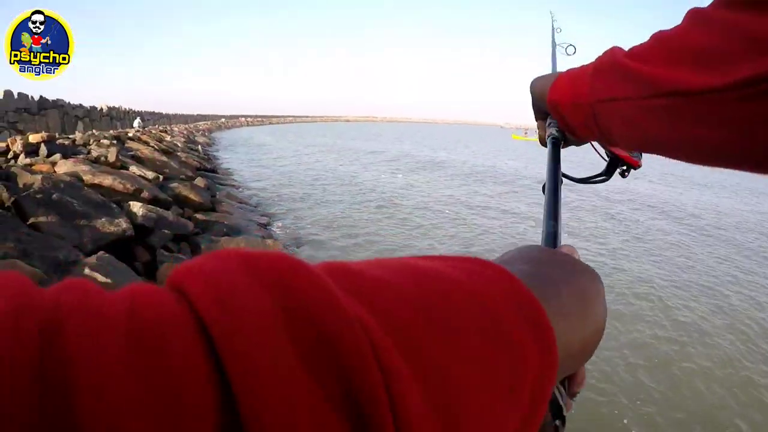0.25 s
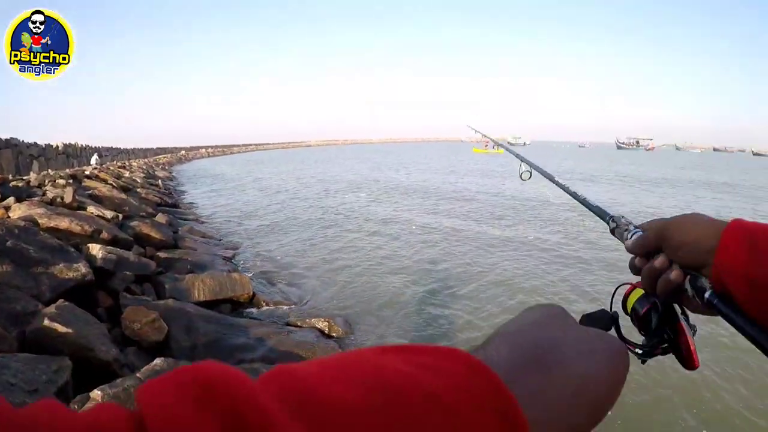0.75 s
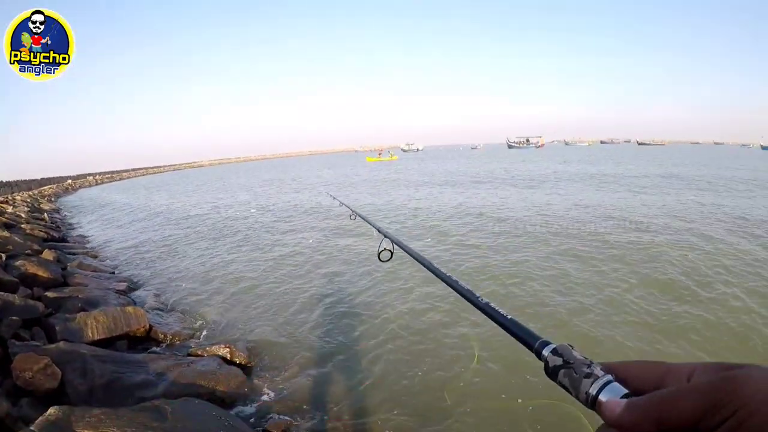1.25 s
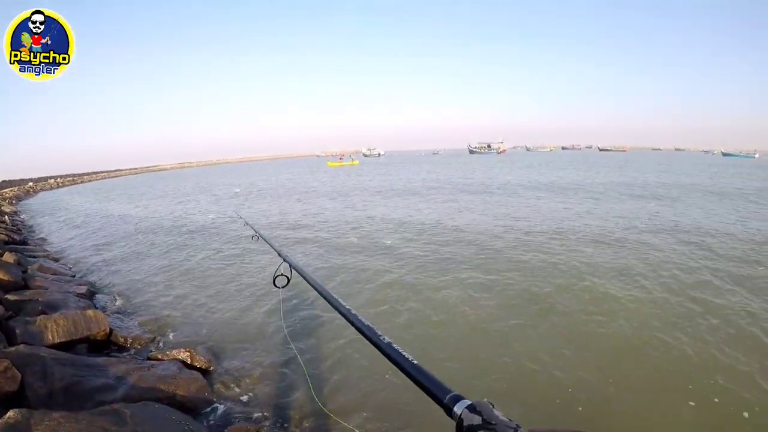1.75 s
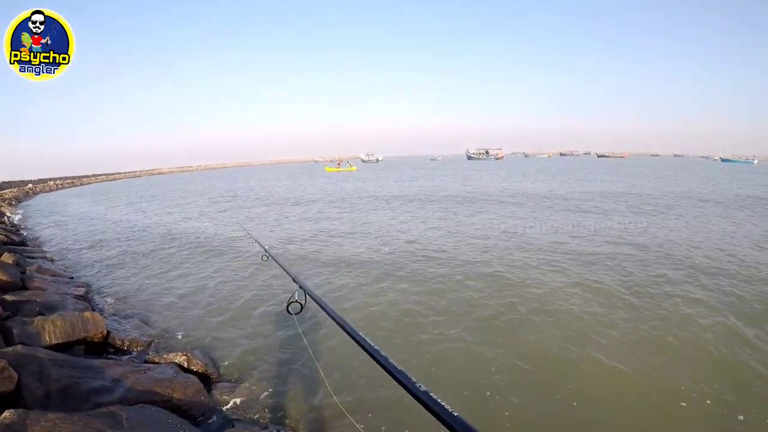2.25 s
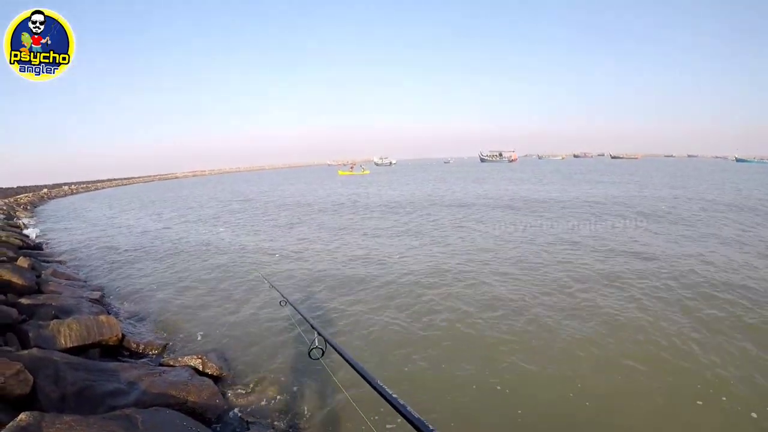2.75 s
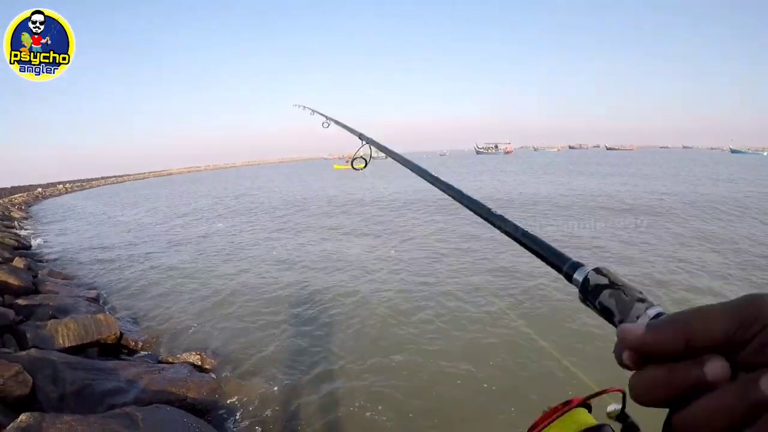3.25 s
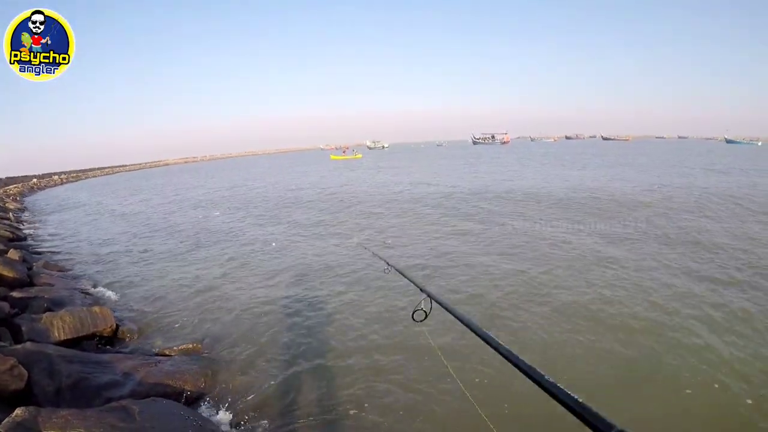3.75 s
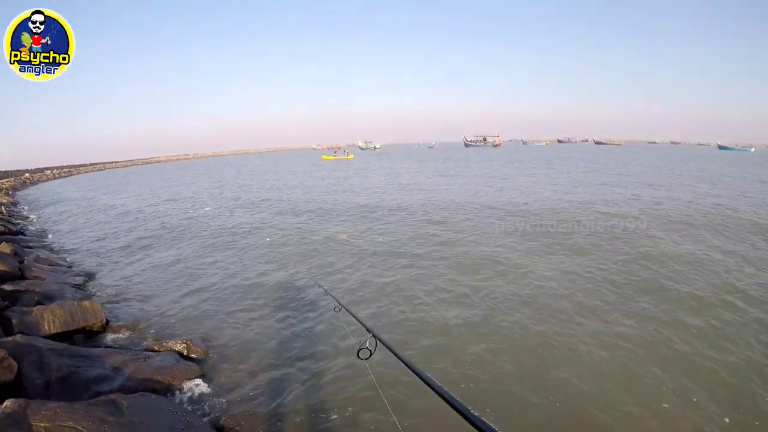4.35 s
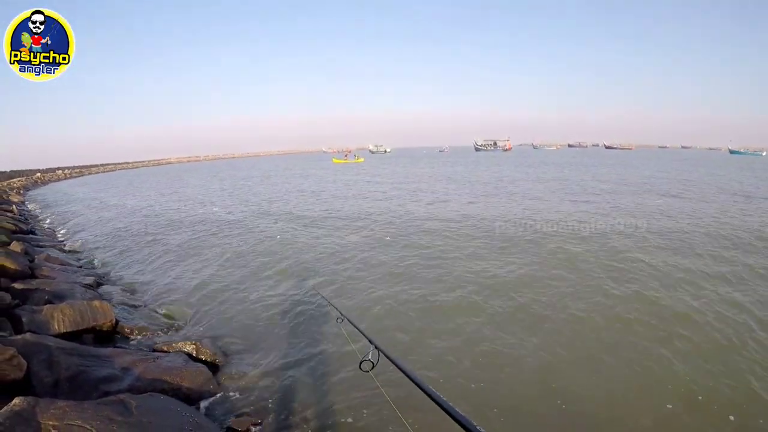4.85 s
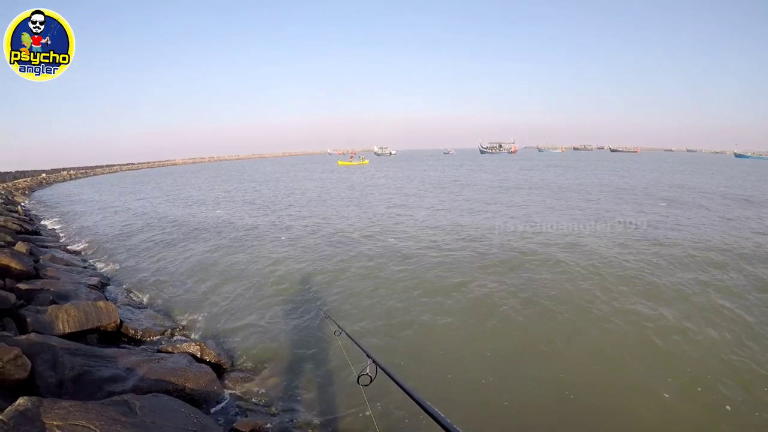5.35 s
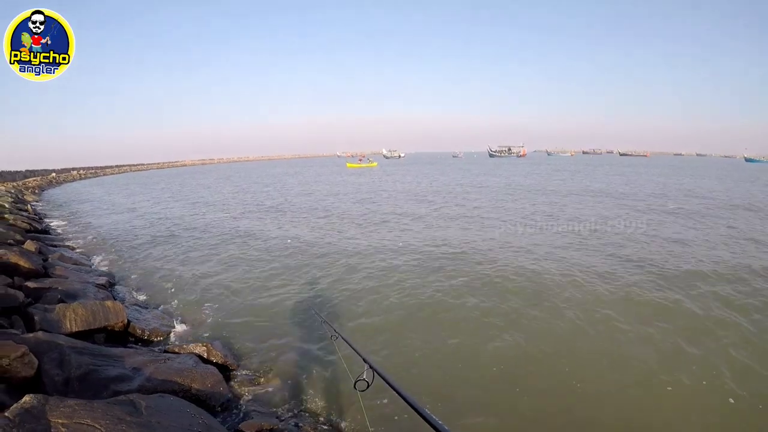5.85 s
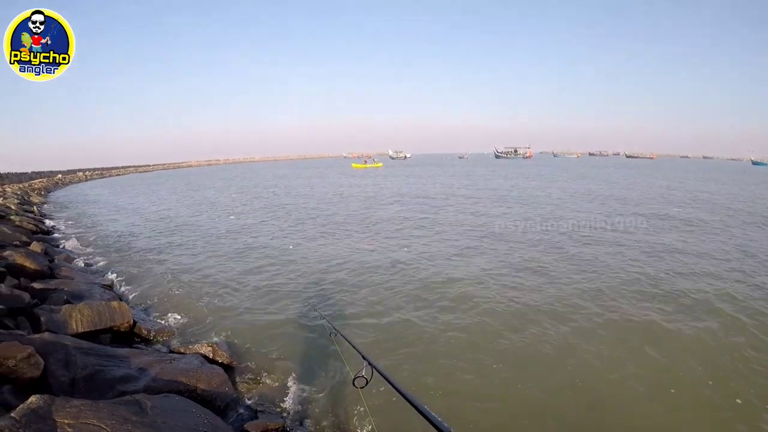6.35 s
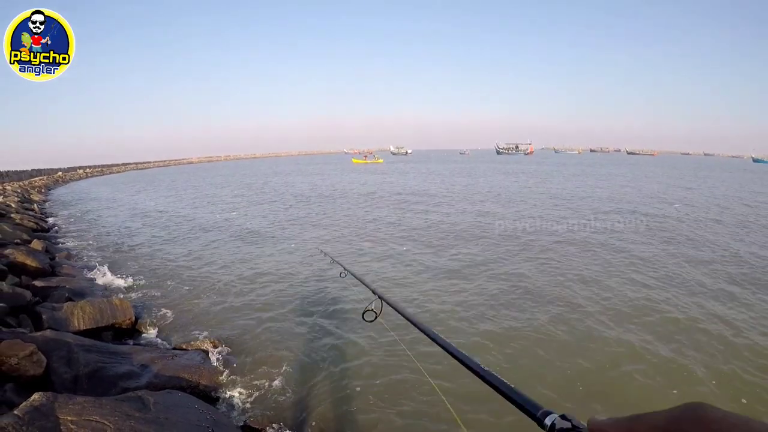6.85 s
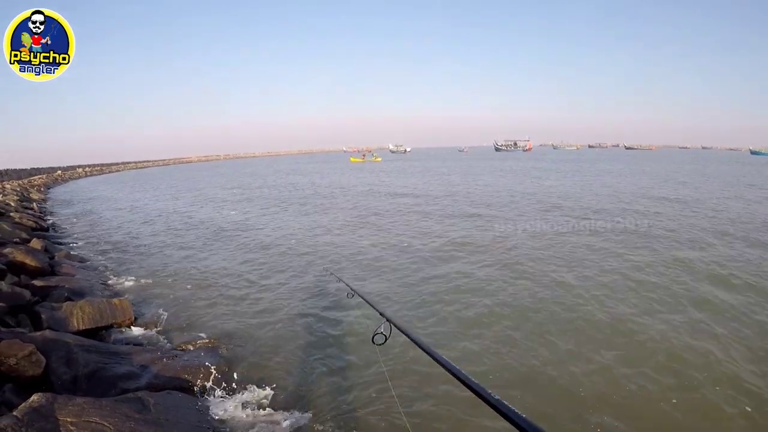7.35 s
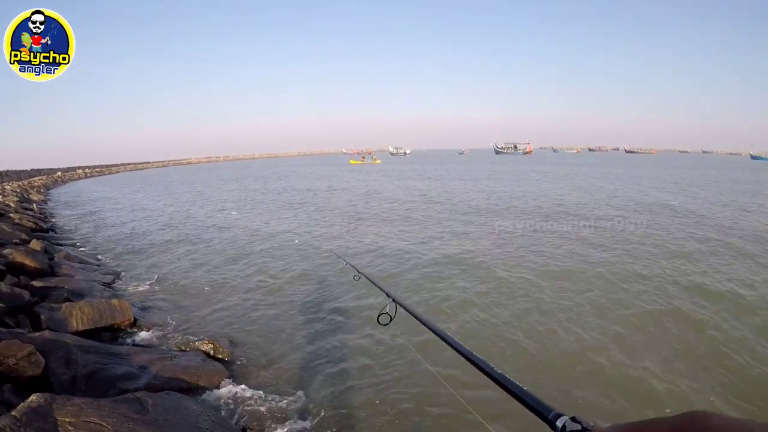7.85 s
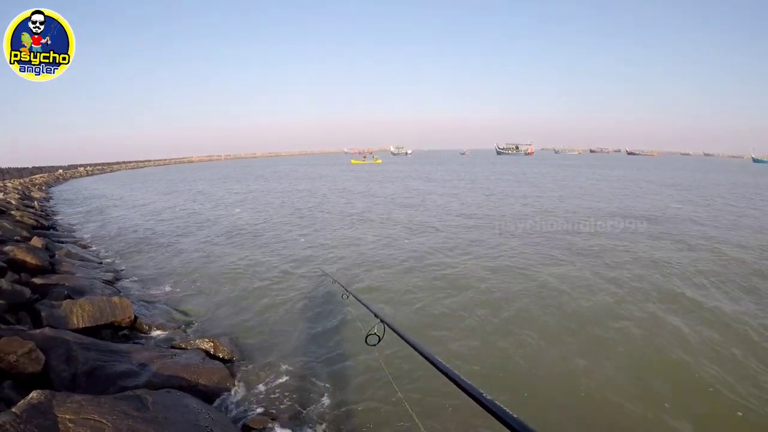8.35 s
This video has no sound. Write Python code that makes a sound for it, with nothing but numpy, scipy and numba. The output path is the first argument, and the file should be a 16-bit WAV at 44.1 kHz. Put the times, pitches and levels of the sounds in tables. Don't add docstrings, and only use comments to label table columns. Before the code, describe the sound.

Small waves gulp and slap against harbour boulders, with foam fizz, wind buffeting, a faint ship drone and one sharp reel click near two seconds.

```python
import sys
import numpy as np
from scipy import signal
from scipy.fft import rfft, irfft
from scipy.io import wavfile
from scipy.ndimage import uniform_filter1d
from numba import njit

SR = 44100
rng = np.random.default_rng(int(sys.argv[2]) if len(sys.argv) > 2 else 0)


def gain_from_db(level_db):
    decades = np.asarray(level_db, float) / 20
    return 10 ** decades


def store_wav(level_fs):
    pcm = np.round(np.clip(np.atleast_2d(level_fs), -1, 1) * 32767)
    wavfile.write(sys.argv[1], SR, pcm.T.astype(np.int16))


N = 379260
TIME = np.arange(N) / SR
FREQ = np.maximum(np.fft.rfftfreq(N, 1 / SR), 1)

# time in seconds, surge in dB, foam left fizzing in dB re surge.
SWELL = [(.36, -35, 1), (.55, -40.5, -3.5), (.78, -40.5, -5.5), (1.45, -53, 4), (2.6, -39.5, -7),
         (3.05, -41.5, -4.5), (3.7, -33.5, 0), (3.95, -29, -9), (4.3, -32, -7.5), (4.85, -39, -6.5),
         (5.1, -40.5, 2.5), (5.85, -38.5, 1), (6.3, -34.5, -2), (6.85, -33, -2), (7.15, -29, -2),
         (7.95, -29, -8), (8.25, -34, -10.5), (8.6, -37, -10.5)]
PART_HZ = [350, 1100, 4200, 8600]
# frequency in Hz, density in dB per Hz.
WASH_SPECTRUM = [(59, -74), (100, -85), (132, -0.5), (162, -3.5), (293, -2), (725, -9), (933, -12),
                 (1580, -16), (2260, -20), (3910, -23.5), (6620, -24), (9680, -31.5), (11500, -24),
                 (13900, -47.5), (15400, -63)]
# time in seconds, level change
# in dB, length in ms.
LULLS = [(0.92, -7, 38), (1.2, -3.5, 90), (2.65, -2, 75), (5.35, 0, 130), (6.83, 2, 29), (7.8, 0, 68),
         (1.779, -4, 6), (3.05, -6, 6), (4.278, -6, 6), (4.389, -3, 6), (3.722, 0, 14), (3.775, -2, 22),
         (3.86, -7, 25), (4.42, 0, 20), (5.66, -2.5, 22), (6.48, -3, 30), (7.075, -13, 21), (7.23, -5, 18),
         (7.41, 3, 17), (7.5, 0.5, 17), (7.64, -2.5, 28)]
LULL_SHARE = [0.45, 0.29, 0.28, 0.29]
# time in seconds, level change in dB, length in ms.
FIZZ = [
    (.5, 1, 54),
    (1.58, 7, 66),
    (3.2, 0, 100),
    (4.15, 1.5, 90),
    (4.5, -1, 48),
    (5.45, -4.5, 380),
    (7.55, -1.5, 32),
    (7.66, -1, 34),
]
FIZZ_SHARE = [0, .2, .7, 1]
# time in seconds, peak in
# dB, pitch in Hz, ring in cycles.
GULPS = [(0.059, -21, 354, 9.1), (0.175, -18, 423, 4.6), (0.271, -15, 374, 7.7), (0.37, -20.5, 263, 6.4),
         (0.607, -23, 1160, 10), (0.822, -25, 670, 12), (3.648, -11.5, 378, 11.3), (3.67, -19.5, 202, 6),
         (3.689, -10.5, 361, 6.6), (3.804, -10, 275, 2), (3.907, -12, 183, 5.2), (4.016, -14, 397, 7.2),
         (4.046, -14, 183, 7.2), (4.329, -24, 300, 4.1), (4.398, -6, 540, 4.9), (5.088, -20.5, 693, 12),
         (5.16, -22, 282, 4.3), (5.59, -23.5, 475, 14), (6.059, -16.5, 284, 7.9), (6.97, -12, 284, 10.3),
         (7.002, -7, 385, 7), (7.039, -10.5, 352, 4.7), (6.955, -14, 205, 7), (7.199, -7, 446, 2.2),
         (7.278, -14.5, 875, 9.2), (7.31, -15, 256, 3.5), (7.445, -9.5, 181, 6), (7.605, -14, 510, 11),
         (7.684, -7.5, 286, 4.4), (7.868, -10.5, 307, 2.5), (8.184, -21, 183, 4.2),
         (0.474, -19.5, 397, 4.6), (0.58, -34, 483, 5), (0.715, -26, 860, 6), (3.839, -21, 600, 5),
         (4.453, -20, 330, 3.6), (4.515, -22, 367, 10), (5.49, -28, 915, 7), (6.241, -27, 638, 5),
         (6.592, -16, 470, 5), (6.627, -13.5, 460, 4.7), (6.793, -18, 455, 5.8), (6.899, -32, 600, 5),
         (7.125, -17, 490, 5), (7.169, -11, 700, 5.5), (7.25, -18, 657, 5), (7.716, -27, 589, 4.5),
         (7.96, -20, 956, 6), (8.198, -19, 630, 6.3),
         (3.698, -17, 800, 7), (3.811, -10.5, 513, 5), (3.821, -13, 208, 3.6), (4.32, -11.5, 280, 2),
               (4.332, -15, 700, 4), (4.63, -19.5, 150, 6), (7.146, -12, 302, 2.1), (7.221, -13, 350, 3.3),
               (7.318, -14.5, 290, 6.5), (7.397, -9, 260, 2.4), (7.455, -11, 330, 3.7),
               (0.24, -13, 330, 6.6), (0.3, -21, 400, 4.5), (5.57, -25, 510, 8)]
# time in seconds, peak in dB, pitch in Hz.
DROPS = [(0.0822, -18, 1830), (0.1431, -21, 3580), (0.1431, -19, 1250), (0.2024, -14, 1260),
         (0.3915, -25, 985), (0.5701, -22, 1620), (0.6529, -22, 1290), (1.7858, -25, 1800),
         (3.0579, -22, 4370), (3.5745, -19, 2240), (3.9402, -16, 1000), (4.076, -23, 1050),
         (4.285, -16, 1080), (5.3632, -25, 918), (5.4964, -34, 1100), (5.5253, -23, 1300),
         (5.7254, -31, 1320), (5.9908, -20, 1730), (7.1237, -15, 931), (7.219, -22, 993),
         (7.8486, -21, 1070), (7.871, -16, 956)]
# time in seconds, peak in dB, centre in Hz, length in ms.
SLAPS = [(3.0, -45, 2870, 2), (3.039, -34, 6600, 3.5), (3.06, -33, 4800, 1.8), (3.25, -25, 1430, 2),
         (3.269, -25.5, 844, 9.2), (3.44, -12.5, 850, 3), (3.46, -28.5, 7600, 5), (3.577, -20, 4470, 4.6),
         (3.694, -21, 780, 32), (3.66, -30, 3520, 47), (3.806, -27.5, 6790, 5.6), (3.941, -30, 1160, 1.8),
         (3.952, -32, 9200, 3), (4.287, -23, 1190, 5), (4.62, -33, 7840, 3.5), (4.741, -34, 6700, 3.9),
         (5.697, -28, 1560, 6.5), (5.7, -34, 4500, 5), (5.888, -37, 6750, 3.6), (6.006, -28, 3070, 3),
         (6.074, -24, 7750, 3.6), (6.297, -28, 4960, 7), (6.361, -27, 9100, 2.3), (6.457, -18, 1130, 4.4),
         (6.633, -25, 3000, 8.1), (6.632, -29.5, 7100, 7.1), (6.792, -27, 7040, 3),
         (7.004, -22.5, 4100, 6.8), (7.174, -18, 700, 16), (7.165, -25.5, 2760, 26),
         (7.45, -24.5, 1170, 110), (3.056, -30, 656, 5.4), (3.355, -28, 600, 6.6), (3.345, -34, 3800, 8),
         (3.469, -30.5, 4200, 12), (3.62, -25, 670, 5.4), (3.805, -19.5, 700, 12), (3.874, -28, 1830, 4),
         (4.074, -26, 800, 6.3), (4.496, -29, 2080, 3), (4.541, -30, 1850, 5.6), (5.182, -37, 1500, 4),
         (5.08, -33.5, 2700, 7.3), (5.799, -29, 915, 5), (6.05, -26, 900, 5.5), (6.576, -25, 2040, 5),
         (6.99, -22, 2230, 5), (7.053, -25, 4900, 6), (7.102, -22.5, 4200, 5), (7.849, -26, 4800, 4.2),
         (8.143, -26, 1750, 4.6)]
# time in seconds, peak in dB, centre in Hz, length in ms.
SPLASHES = [(3.577, -26, 2000, 4.4), (4.8, -39, 7800, 4), (4.6, -33, 4200, 5), (5.497, -33, 4000, 6),
            (5.182, -29, 4200, 4), (5.01, -38, 4700, 5), (3.68, -32, 5000, 40), (3.745, -30.5, 3400, 15),
            (3.95, -33.5, 6200, 60), (7.03, -19, 460, 39), (7.18, -19.5, 370, 39), (7.455, -20, 480, 26)]
# time in seconds, peak in dB, centre in Hz.
TICKS = [(0.497, -33, 1700), (0.576, -30, 1900), (0.772, -36, 1900), (0.806, -35, 1000), (0.802, -40, 6750),
         (0.932, -48, 9600), (0.953, -35, 3390), (1.099, -32, 3950), (1.575, -40, 7000), (1.575, -38, 1730),
         (1.593, -39.5, 6700), (1.592, -36.5, 1950), (1.778, -35.5, 3900), (1.788, -31, 1510),
         (1.886, -46, 4200), (1.99, -37, 1000), (2.068, -38, 2950), (2.212, -41, 8600),
         (2.237, -39.5, 8000), (1.328, -41, 2200), (1.328, -44, 4100), (1.407, -38, 4770),
         (1.46, -44, 3300), (1.532, -45, 7200), (1.655, -43, 5130), (1.747, -37.5, 1900),
         (1.916, -49, 4100), (1.962, -49, 3700), (1.15, -44, 3000), (0.953, -43, 1600), (1.1, -45, 2100)]
# time in seconds, level in dB.
LINE_LEVEL = [(0, -49.5), (.8, -52.5), (1.1, -51.5), (1.4, -51), (1.7, -62), (2.2, -79), (2.3, -101),
              (4.85, -79), (5.05, -51), (5.45, -51), (5.9, -59), (6.2, -80)]
# centre in Hz, width in Hz, level in dB.
LINE_PEAKS = [(4500, 930, -2), (5850, 1000, -2), (9100, 2200, -10), (9400, 300, -18), (12500, 2800, -15)]
# frequency in Hz, level in dB, T60 in seconds.
BAIL_MODES = [(800, -8.5, 0.011), (1600, -8.5, 0.018), (1790, 3.5, .005), (2200, -13, 0.0057),
              (2830, -23, 0.012), (4600, -21.5, 0.012), (7300, -18, .004)]
# time in seconds, rumble in dB, low-cut residue in dB re rumble.
WIND_LEVEL = [(0.0, -45, -34), (0.36, -41.5, 1), (1.58, -57, 13.5), (2.01, -31.5, -2.5), (2.4, -30.5, -5.5),
              (2.94, -29, -3.5), (3.02, -35.5, -10), (3.28, -32, -14), (3.62, -34, -6), (3.75, -41.5, -9),
              (4.79, -42.5, 3.5), (6.82, -68.5, -1), (7.5, -65, 12), (8.2, -70, 23), (8.6, -67, 27)]
# frequency in Hz, density in dB per Hz.
GUST_SPECTRUM = [(12, -33), (20, 0.5), (49, 1), (139, 6.5), (316, -18), (357, -20), (403, -25), (500, -23),
                 (650, -51), (1100, -120)]
# time in seconds, peak in dB, frequency in Hz, length in ms.
BUFFETS = [(1.695, -19.5, 193, 10), (1.952, -22, 202, 5.6), (1.97, -21.5, 208, 8), (2.012, -14, 168, 16),
           (2.073, -11.5, 265, 5.8), (2.102, -15.5, 162, 9.3), (2.165, -22, 243, 8.3),
           (2.185, -15, 211, 3.6), (2.32, -16, 180, 19), (2.425, -31, 143, 19), (2.553, -20.5, 182, 6.9),
           (2.596, -22.5, 151, 17), (2.932, -17.5, 151, 6.5), (3.584, -13.5, 167, 5),
           (3.634, -23, 168, 7.6), (4.185, -21, 179, 17), (4.361, -14.5, 205, 4.6),
           (4.384, -15.5, 173, 8.1), (4.423, -22, 169, 11), (4.641, -22, 174, 19), (4.754, -21, 176, 39),
           (4.82, -22, 179, 28), (4.994, -21, 168, 12), (5.81, -21.5, 198, 8.2), (6.15, -24, 180, 9),
           (8.332, -17.5, 220, 10), (8.354, -14, 180, 15), (8.384, -21.5, 183, 15), (8.421, -19, 194, 12)]
# time in seconds, peak in dB, frequency in Hz, length in ms.
LEE_BUFFETS = [
    (1.794, -19, 218, 7.8),
    (1.899, -21.5, 188, 7.6),
    (2.242, -23, 157, 4.9),
    (2.762, -18, 148, 9.1),
]
# time in seconds, peak in dB, frequency in Hz, length in ms.
THUMPS = [
    (2.089, -25, 108, 30),
    (2.285, -26, 83.4, 30),
    (2.493, -24, 91.5, 30),
    (2.719, -22, 51.1, 30),
    (2.892, -21, 51.1, 30),
    (3.127, -26, 70.0, 30),
]
# time in seconds, level in dB.
DRONE_LEVEL = [(0, -39), (.5, -40), (1.4, -39.5), (2, -38.5), (2.6, -43.5), (3.2, -42), (3.8, -56),
               (8.6, -51.5)]
# frequency in Hz, lead in radians.
LEFT_LEAD = [(0, 0), (430, -.3), (775, -1.3), (1120, -3.5), (1460, -3.8), (2150, -6.7), (2500, -8.9),
             (4220, -6.5), (4900, -8.2), (5900, -10.6), (7000, -9.9), (9000, -12.2), (15000, -15)]
# frequency in Hz, gain in dB.
LEFT_TILT = [(150, 1.5), (430, 0), (780, -4.5), (1150, -7.5), (1800, -5), (2900, 0), (4200, -1), (5100, 4),
             (6200, -1), (9400, 1)]
# frequency in Hz, coherence 0 to 1.
ALIKE = [(150, .99), (430, .93), (780, .65), (1300, .5), (2400, .25), (4100, .6), (6000, .4), (12000, .3)]
# centre in Hz, width in Hz, gain in dB.
GROUND_NOTCHES = [(1430, 95, -2.5), (2770, 290, -1)]
# time in seconds, side share 0 to 1.
WIDTH = [(0, 0.003), (1.0, 0.0017), (1.05, 0.15), (1.4, 0.52), (1.9, 0.86), (8.6, 1)]
# time in seconds, threshold in dB re local mean, top in Hz.
SPARSE = [(0, -10, 15200), (1.2, -10, 15300), (1.35, 3, 15150), (2.25, 4.5, 15050), (2.35, 6.5, 14000),
          (3.2, 6.5, 14200), (5.5, 7, 14400), (7.0, 7.5, 14200), (8.6, 7, 14200)]

BAIL_S, BAIL_DB = 2.2805, -2


def unit(x):
    return x / np.sqrt(np.mean(x ** 2))


def curves(table):
    s, *columns = np.transpose(table)
    return [np.interp(TIME, s, column) for column in columns]


def on_log(hz, table):
    f, value = np.transpose(table)
    return np.interp(np.log(hz), np.log(np.maximum(f, 1)), value)


def humps(table):
    return sum(db * np.exp(-((TIME - s) * 1000 / ms) ** 2) for s, db, ms in table)


def band(x, hz, width_hz):
    edges = np.clip([hz - width_hz / 2, hz + width_hz / 2], 5, SR / 2 - 1000)
    return signal.sosfilt(signal.butter(2, edges, "bandpass", fs=SR, output="sos"), x)


def walk(rate_hz):
    k = int(SR / rate_hz)
    held = np.repeat(rng.standard_normal(N // k + 1), k)
    return unit(uniform_filter1d(uniform_filter1d(held, k), k)[:N])


@njit
def bubbles(n, start, turn, cycles, size, glide):
    out = np.zeros(n)
    for k in range(len(start)):
        length = cycles[k] * 2 * np.pi / turn[k]
        phase = 0.
        for i in range(min(int(3 * length), n - start[k])):
            u = i / length
            phase += turn[k] * (1 + glide * u)
            out[start[k] + i] += size[k] * np.sin(phase) * 8 * u * np.exp(-3 * u)
    return out


def ports(direct, scattered):
    alike = np.clip(on_log(FREQ, ALIKE), 0, 1)
    gain = gain_from_db(on_log(FREQ, LEFT_TILT))
    lead = np.interp(FREQ, *np.transpose(LEFT_LEAD))
    ground = gain_from_db(sum(db * np.exp(-((FREQ - hz) / width) ** 2) for hz, width, db in GROUND_NOTCHES))
    right = rfft(direct)
    left = (alike * right + np.sqrt(1 - alike ** 2) * rfft(scattered)) * gain * np.exp(1j * lead)
    centre = np.sqrt(1 + gain ** 2 + 2 * alike * gain * np.cos(lead)) / 2
    return irfft(np.array([left, right]) / centre * ground, N)


def wash_parts():
    surge, foam = curves(SWELL)
    sleeve = 1 / (1 + (TIME / 0.78) ** 6)
    early = np.interp(TIME + 0.06, TIME, surge)
    air = 1.32 * np.maximum(early, -41) + 6 * sleeve
    spray = 1.305 * surge + 0.54 * foam - 18 * sleeve
    parts = np.array([air, surge, surge + foam, spray])
    return parts + np.outer(LULL_SHARE, humps(LULLS)) + np.outer(FIZZ_SHARE, humps(FIZZ))


def wash():
    parts = wash_parts()
    usual = np.mean(gain_from_db(2 * parts[:, int(6.4 * SR):8 * SR]), axis=1)
    parts -= 10 * np.log10(usual)[:, None]
    slosh = np.array([walk(24) for _ in PART_HZ])
    patter = np.array([walk(70) for _ in PART_HZ])
    patter = np.clip(patter - .8, 0, 1.4)
    out = np.zeros((2, N))
    for hz in 125 * 2 ** np.arange(0, 7, 1 / 3):
        share = [np.interp(np.log(hz), np.log(PART_HZ), row) for row in np.eye(4)]
        high = min(hz / 2000, 1) * min(9000 / hz, 1) ** 2
        db = np.dot(share, parts + 0.84 * slosh + 3.6 * high * patter)
        db = db + (2.5 - 1.6 * high) * walk(25)
        gain = gain_from_db(db + on_log(hz, WASH_SPECTRUM) + 10 * np.log10(hz) - 56.5)
        chance = rng.random((2, int(8.6 * (30 + hz * .1)), 3))
        for path, (at, pitch, big) in enumerate(chance.transpose(0, 2, 1)):
            start = (at * N).astype(np.int64)
            turn = 2 * np.pi / SR * hz * (0.866 + .24 * pitch)
            ring = bubbles(N, start, turn, np.full(len(at), 5.5), gain_from_db(14.3 * big ** 4), .12)
            rush = band(rng.standard_normal(N), hz, .25 * hz)
            out[path] += gain * (gain_from_db(-2.0) * unit(ring) + unit(rush))
    return ports(*out)


def gulps():
    drops = [(s + 0.00301, db - 1, hz, 4.4) for s, db, hz in DROPS]
    s, db, hz, cycles = np.transpose([*GULPS, *drops])
    start = ((s - .003) * SR).astype(np.int64)
    ring = bubbles(N, start, 2 * np.pi * hz / SR, np.clip(cycles, 1, 20), gain_from_db(db - 5.0), 0.015)
    swell = np.sqrt(np.abs(uniform_filter1d(ring ** 2, size=400)))
    clump = gain_from_db(-15) * swell * unit(band(rng.standard_normal((2, N)), 1000, 1540))
    return ports(ring + clump[0], np.roll(ring, 30) + clump[1])


def slaps():
    pad = 1000
    out = np.zeros((2, N + 2 * pad))
    t = np.arange(-pad, pad) / SR
    ticks = [(s, db, hz, 5.4) for s, db, hz in TICKS]
    for s, db, hz, ms in [*SLAPS, *ticks, *SPLASHES]:
        side_ms = np.where(t < 0, .22, .75) * max(ms, 2)
        swell = np.exp(-(t * 1000 / side_ms) ** 2)
        burst = swell * band(rng.standard_normal((2, len(t))), hz, 0.5145 * hz)
        burst *= np.sqrt(np.sum(swell ** 2) / np.sum(burst ** 2, axis=1, keepdims=True) / 2)
        at = int(s * SR)
        out[:, at:at + len(t)] += gain_from_db(db + 1.0) * burst
    return ports(*out[:, pad:N + pad])


def line_hiss():
    hiss = sum(gain_from_db(db) * unit(band(rng.standard_normal((2, N)), hz, width_hz))
               for hz, width_hz, db in LINE_PEAKS)
    return ports(*(hiss * gain_from_db(curves(LINE_LEVEL)[0] + 1.2 * walk(24.2))))


def bail_snap():
    t = np.arange(2000) / SR
    ring = sum(gain_from_db(db) * np.sin(2 * np.pi * hz * t) * np.exp(-t * np.log(1000) / t60_s)
               for hz, db, t60_s in BAIL_MODES)
    ring = -ring * (1 - np.exp(-(t / .00045) ** 2))
    ring = gain_from_db(BAIL_DB) * ring / np.abs(ring).max()

    def struck(gain, hz, decay_s, rise_s):
        return gain * np.sin(2 * np.pi * hz * t) * np.exp(-t / decay_s) * (1 - np.exp(-t / rise_s))

    thud = struck(gain_from_db(-9), 140, .009, .001)
    knock = struck(.4, 420, .003, .0003)
    ping = struck(.22, 2950, .0018, .0003)
    arrivals = [(1, 0, ring), (0, 12, .3 * ring), (0, 48, -.9 * ring),
                (1, 130, thud), (0, 215, thud), (1, 142, knock), (0, 142, -knock),
                (0, 26, ping), (1, 750, .08 * ring), (0, 790, .04 * ring)]
    out = np.zeros((2, N))
    at = int(BAIL_S * SR)
    for port, late, sound in arrivals:
        out[port, at + late:at + late + len(t)] += sound
    rattle = band(rng.standard_normal((2, len(t))) * np.exp(-t / .0015), 2600, 4000)
    out[:, at + 8:at + 8 + len(t)] += gain_from_db(-20) * rattle
    return out


def wind():
    rumble_db, flutter_db = curves(WIND_LEVEL)
    out = np.zeros((2, N))
    for port, side_db in enumerate((-1.0, 3.5)):
        shape = gain_from_db(on_log(FREQ, GUST_SPECTRUM)) / (1 + (FREQ / 105) ** 8)
        low = unit(irfft(rfft(rng.standard_normal(N)) * shape, N))
        flutter = unit(band(rng.standard_normal(N), 189, 138))
        out[port] = low * gain_from_db(rumble_db + 2.2 * walk(18))
        out[port] += flutter * gain_from_db(rumble_db + flutter_db + 3.4 * walk(30))
        out[port] *= gain_from_db(side_db)
    shed = [(3.2 + (k + 0.3 * a) * 0.02, -32 + 2.3 * b, 143 * (1 + 0.08 * c), 12)
            for k, (a, b, c) in enumerate(rng.standard_normal((9, 3)))]
    thumps = [(s + .012, db - 4.0, hz, ms) for s, db, hz, ms in THUMPS]
    half = 2000
    t = np.arange(-half, half) / SR
    for port, events in ((1, [*BUFFETS, *shed, *thumps]), (0, LEE_BUFFETS)):
        for s, db, hz, ms in events:
            eddy = np.exp(-(t * 1000 / (0.47 * ms)) ** 2) * np.cos(2 * np.pi * (hz * t + rng.random()))
            at = int(s * SR)
            out[port, at - half:at + half] += gain_from_db(db + 5.0) * eddy
    return out


def drone():
    phase = 2 * np.pi * np.cumsum(168 * (1 + 0.0051 * walk(12))) / SR
    tone = sum(gain_from_db(db + 1.0 * walk(11)) * np.sin(order * phase)
               for order, db in ((1, 0.5), (2, -11), (3, -25)))
    return tone * gain_from_db(curves(DRONE_LEVEL)[0] + 4.5)


def wind_filter(x):
    return signal.sosfilt(signal.ellip(6, .5, 50, 136, "highpass", fs=SR, output="sos"), x)


def scene():
    since_s = TIME - BAIL_S - .004
    duck = gain_from_db(-7 * (since_s > 0) * np.exp(-np.abs(since_s) / 0.067))
    water = wind_filter(duck * wash() + gulps() + slaps())
    return water + line_hiss() + bail_snap() + wind() + drone()


def thin_treble(x):
    f, s, lines = signal.stft(x, SR, nperseg=2048)
    hz = f[:, None]
    at, floor_db, top_hz = np.transpose(SPARSE)
    size = np.abs(lines)
    mean = uniform_filter1d(uniform_filter1d(size, size=32, axis=1), size=3, axis=2)
    patch = np.repeat(rng.standard_normal((1, len(f) // 8 + 1, len(s))), 8, axis=1)[:, :len(f)]
    dip_db = 2.5 * (s > BAIL_S) * np.exp(-((hz - 11700) / 600) ** 2)
    strong = size > mean * gain_from_db(np.interp(s, at, floor_db) + 2.2 * patch + dip_db)
    below_top = hz < np.interp(s, at, top_hz) + 250 * (s > WIDTH[1][0]) * patch[:, -1:]
    below_thinning = hz < 10620 + 250 * patch[:, :1]
    attack = np.any([abs(s - hit) < .012 for hit in (1.585, BAIL_S - .005, 6.074)], axis=0)
    keep = (strong & below_top) | below_thinning | attack
    return signal.istft(lines * keep, SR, nperseg=2048)[1][:, :N]


def low_pass(x):
    return signal.sosfilt(signal.butter(12, 15540, fs=SR, output="sos"), x)


def record(dry):
    treble_dip = np.clip(1.5 - np.abs(TIME - BAIL_S - .010) / .004, 0, .9)
    heard = thin_treble(dry - treble_dip * band(dry, 9800, 14400))
    heard = heard + gain_from_db(-75) * unit(band(rng.standard_normal(N), 50, 80))
    mid = heard.mean(axis=0)
    side = (heard[0] - heard[1]) / 2 * np.clip(curves(WIDTH)[0], 0, 1)
    return low_pass(np.array([mid + side, mid - side]))


dry = scene()
out = record(dry)
store_wav(out)
```